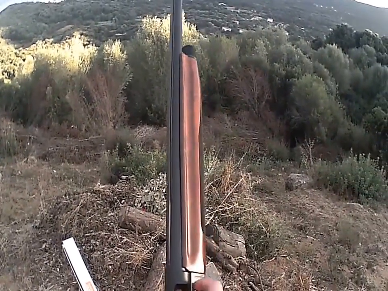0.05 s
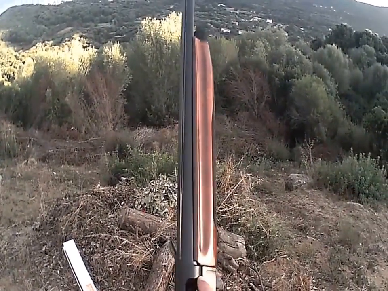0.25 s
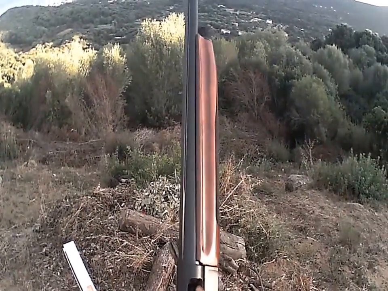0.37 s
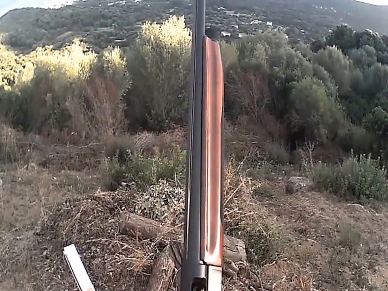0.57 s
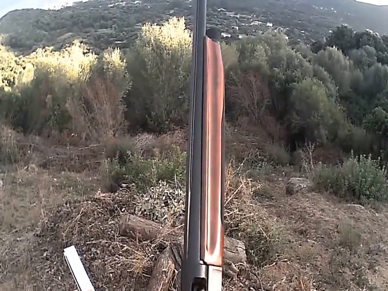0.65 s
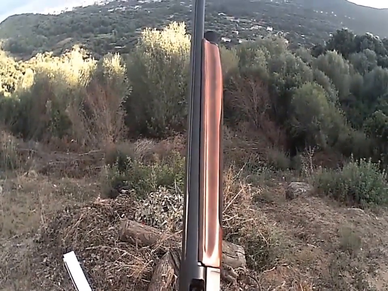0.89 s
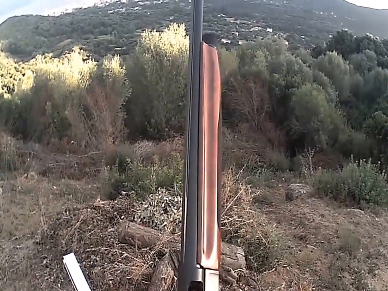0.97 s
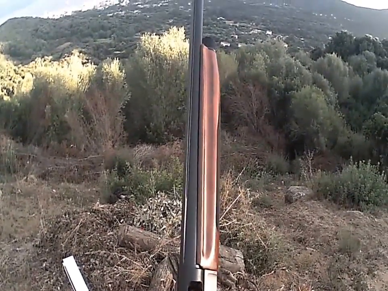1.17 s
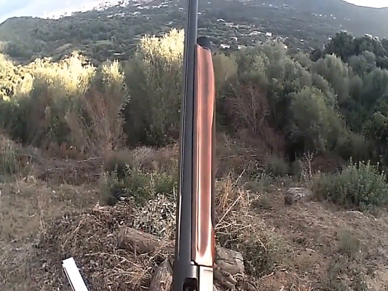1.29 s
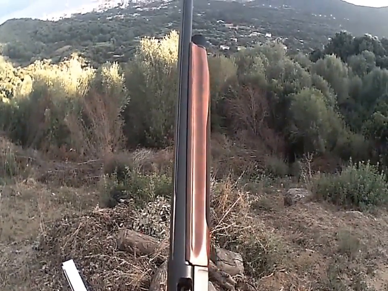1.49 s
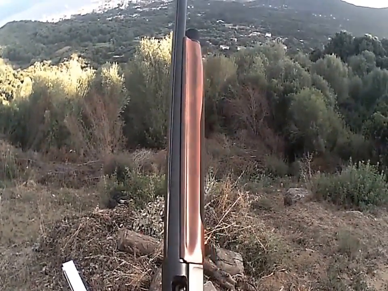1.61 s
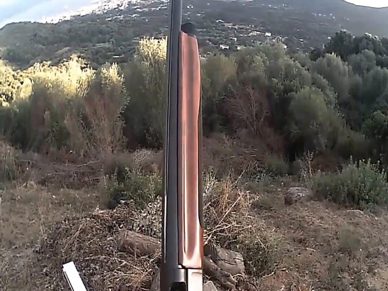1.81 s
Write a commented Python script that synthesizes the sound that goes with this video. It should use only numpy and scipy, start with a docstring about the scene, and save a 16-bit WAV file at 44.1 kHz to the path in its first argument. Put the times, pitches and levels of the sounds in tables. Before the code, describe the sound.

A shotgun action snaps shut with a sharp metallic clack, then faint handling ticks over quiet hiss

```python
"""Outdoors, in a light breeze, a shotgun is handled close to the microphone. Steel scrapes and ticks, then
the action snaps home in a quick run of blows that rings through the gun, and loose parts rattle.
Afterwards the hands shift on the gun with a few faint ticks. Blows and ticks are noise bursts with pinging
modes, blows add the ring of the whole gun, slides are filtered grains, and hiss and breeze are shaped noise.
"""
import sys
import numpy as np
from scipy import signal
from scipy.fft import rfft, irfft
from scipy.io import wavfile
from scipy.ndimage import uniform_filter1d

SR = 44100
rng = np.random.default_rng(int(sys.argv[2]) if len(sys.argv) > 2 else 0)


def bounce(signal):
    """Save signal as a 16-bit WAV file at the path given by the first command-line argument."""
    frames = np.transpose(np.atleast_2d(signal))
    limited = np.clip(frames, -1, 1)
    pcm = np.round(limited * 32767).astype(np.int16)
    wavfile.write(sys.argv[1], SR, pcm)


N = 81585


def amp(db):
    """Turns decibels into gain."""
    return 10 ** (np.asarray(db) / 20)


def evened(x):
    """Scales to rms 1."""
    return x / np.sqrt(np.mean(x ** 2) + 1e-20)


def read(points, hz):
    """Reads a table of (Hz, value) along a log-frequency axis."""
    f, value = np.transpose(points)
    return np.interp(np.log(hz + 1), np.log(f + 1), value)


def add(mix, start_s, sound):
    """Mixes a sound in from its start time."""
    part = mix[round(start_s * SR):][:len(sound)]
    part += sound[:len(part)]


def decay(t, t60):
    """Falls by 60 dB in t60 seconds."""
    return np.exp(-np.log(1000) * t / np.maximum(t60, 1e-4))


def contact(t):
    """The force of a contact builds up in a fraction of a millisecond."""
    build_up_s = 0.0001
    return 1 - np.exp(-(t / build_up_s) ** 2)


def coloured(x, points, hz=1000, lift_db=0, size=4096):
    """Causal filter of unit energy: a spectrum with one resonance lifted out of it."""
    f = np.fft.rfftfreq(size, 1 / SR)
    width_hz = 260 + 0.069 * hz  # a base plus a share of the pitch
    peak = (amp(lift_db) ** 2 - 1) / (1 + ((f - hz) / width_hz) ** 2) ** 2
    log_gain = np.log(evened(amp(read(points, f)) * np.sqrt(1 + peak)))
    # minimum phase puts the energy at the front of the response
    full = np.concatenate([log_gain, log_gain[-2:0:-1]])
    taps = np.fft.ifft(np.exp(np.conj(signal.hilbert(full)))).real
    return signal.fftconvolve(x, taps[:size // 2])[:len(x)]


def noise(points):
    """Steady noise of a given spectrum, at rms 1."""
    gain = amp(read(points, np.fft.rfftfreq(N, 1 / SR)))
    return evened(irfft(rfft(rng.standard_normal(N)) * gain, N))


def burst(t60, size=4096, count=3):
    """Countless modes struck at once: a sharp start, an even spectrum, a steady decay."""
    t = np.arange(size) / SR
    fall = decay(t, t60)
    x = rng.standard_normal(size) * fall
    for _ in range(count):
        # flatten the spectrum, then smooth the envelope and tame stray peaks
        x = irfft(np.exp(1j * np.angle(rfft(x))))
        steady = x / np.sqrt(abs(uniform_filter1d(x ** 2, size=64)) + 1e-14)
        x = 2 * np.tanh(steady / 2) * fall * contact(t)
    return x


def part_ring(hz, t60, size=4096):
    """A small steel part pings: one main mode between two weaker ones."""
    split, twin_db = 0.11, -6  # typical spacing as a share of the pitch; level of each side mode
    t = np.arange(size) / SR

    def mode(side):
        ratio = 1 + side * split * rng.uniform(0.56, 1.36)
        phase = side * rng.uniform(0, 2 * np.pi)
        return np.sin(2 * np.pi * hz * ratio * t + phase)

    modes = mode(0) + amp(twin_db) * (mode(-1) + mode(1))
    modes *= np.sqrt(2) / np.sqrt(1 + 2 * amp(twin_db) ** 2)
    return contact(t) * decay(t, t60) * modes


# Spectrum of the even hiss. Each row: frequency in Hz, relative density in dB per Hz.
HISS_SPECTRUM = [(30, -5), (100, -2), (200, -5.5), (300, -9), (700, -12.5), (1500, -16), (2100, -18),
                 (2600, -17), (3900, -21), (8000, -24), (14500, -25), (16000, -32)]


def hiss():
    """Even hiss: steady noise that thins out towards the treble."""
    return amp(-56.5) * noise(HISS_SPECTRUM)


# Spectrum of the breeze's rumble. Each row: frequency in Hz, relative density in dB per Hz.
BREEZE_SPECTRUM = [(8, -11.5), (20, -3), (30, -0.5), (40, -1), (49, -1), (62, -6.5), (100, -19.5),
                   (160, -37), (400, -58)]


def breeze():
    """The low rumble of a breeze on the microphone, its level drifting slightly with the gusts."""
    level_db, gust_db, gust_s = -55, 0.5, 0.2  # mean level, spread of the drift, time between its turns
    t = np.arange(N) / SR
    knots = rng.standard_normal(size=64)
    gusts = np.interp(t / gust_s, np.arange(len(knots)), knots)
    return amp(level_db + gust_db * gusts) * noise(BREEZE_SPECTRUM)


# Light ticks of small parts. Each row: start in seconds, crack level in dB, pitch of the part in Hz,
# level of its ping in dB, t60 of both in seconds.
TICK_EVENTS = [(0.164, -51, 6500, -53, 0.024), (.1693, -42, 2000, -47, .014), (.1760, -49, 5700, -52, 0.05),
               (.1828, -45, 14800, -42, 0.018), (0.1836, -44, 1980, -37.5, 0.023),
               (0.1944, -28, 11750, -23.5, .009), (0.1961, -35.5, 1960, -38, 0.016),
               (0.2627, -33, 5900, -31.5, 0.0092), (0.2711, -34.5, 5680, -32.5, 0.0117),
               (0.4738, -41, 5280, -42, 0.0094), (1.2518, -44, 3300, -39, .011),
               (1.2520, -39, 6550, -38, .009), (1.2514, -47, 14300, -40, .008),
               (1.261, -44, 3590, -44, .015), (1.3356, -54, 3300, -55, 0.019),
               (1.3360, -58, 14000, -51, .012), (1.3520, -49, 13900, -42, .013),
               (1.4004, -62, 3280, -54.5, .018), (1.4600, -55, 5000, -56.5, .012),
               (1.5135, -49, 12000, -54, 0.014), (1.836, -54, 3000, -54, 0.018)]
# Colour of a light touch, for ticks and slides. Each row: frequency in Hz, relative density in dB per Hz.
TOUCH_COLOUR = [(100, -16), (400, -7), (1000, -2), (3500, 1.5), (7000, -0.5), (10000, -2), (14800, -7),
                (16000, -21)]


def ticks():
    """Light contacts ring only the small part that is touched."""
    out = np.zeros(N)
    for start_s, crack_db, hz, part_db, t60 in TICK_EVENTS:
        crack = amp(crack_db) * coloured(burst(t60), TOUCH_COLOUR)
        ping = amp(part_db) * part_ring(hz, t60)
        add(out, start_s, crack + ping)
    return out


# Colour of the echo from ground and bushes. Each row: frequency in Hz, relative density in dB per Hz.
SCATTER_COLOUR = [(200, -9), (1500, 0), (6000, -4), (16000, -4)]


def scatter(x):
    """Ground and bushes return a faint, short tail of decaying noise."""
    level_db, t60_s = -33.5, 0.45
    t = np.arange(SR // 2) / SR
    tail = coloured(rng.standard_normal(len(t)) * decay(t, t60_s), SCATTER_COLOUR)
    return amp(level_db) * signal.fftconvolve(x, tail / np.linalg.norm(tail))[:N]


# Sliding of steel and hands on the gun. Each row: start in seconds, length in seconds, level in dB,
# pitch of the resonance in Hz, its prominence in dB.
SLIDE_STROKES = [(.181, 0.013, -47, 1000, 15), (0.198, .024, -48, 1200, 11), (0.252, 0.032, -57, 5700, 1),
                 (.446, .012, -54, 2800, 13), (0.46, 0.02, -55, 2000, 14), (1.248, 0.022, -52, 1150, 10.5),
                 (1.308, .011, -51, 1100, 23), (1.41, 0.094, -62, 15300, 25), (1.836, .02, -56.5, 790, 18)]


def slides():
    """Sliding surfaces catch and slip in tiny grains under a swelling stroke."""
    grains_per_s, grain_spread_db = 7000, 4
    out, t = np.zeros(N), np.arange(N) / SR
    for start_s, length_s, db, hz, lift_db in SLIDE_STROKES:
        grains = rng.standard_normal(N) * (rng.random(N) < grains_per_s / SR)
        grains *= amp(grain_spread_db * rng.standard_normal(N))
        stroke = np.sqrt(abs(np.sin(np.pi * np.clip((t - start_s) / length_s, 0, 1))))
        out += amp(db) * coloured(evened(grains) * stroke, TOUCH_COLOUR, hz, lift_db)
    return out


# Clear modes of receiver and barrels. Each row: pitch in Hz, relative level in dB, t60 in seconds.
GUN_MODES = [(580, -12, .04), (770, -4, .03), (870, -3, .03), (1230, -8, 0.043), (1518, -0.5, 0.026),
             (1646, -6.5, 0.028), (1953, 0, 0.035), (2240, -3, 0.046), (2820, -2, 0.03), (3010, -2, .042),
             (3300, -5, .045), (3740, -3.5, 0.042), (4400, -11.5, .045), (5810, -6, 0.035),
             (7130, -5, .032), (14530, 2.5, 0.034)]
# Dense ringing between these modes. Each row: frequency in Hz, relative density in dB per Hz.
WASH_COLOUR = [(100, -40), (300, -19), (600, -0.5), (950, 0), (1500, -2), (3500, -3), (6500, -3),
               (9000, -7), (12500, -6.5), (15000, -6), (16000, -16)]
# Decay of the dense ringing. Each row: frequency in Hz, t60 in seconds.
WASH_T60 = [(400, 0.033), (1500, 0.042), (5000, .038), (15000, 0.047)]


def gun_ring(size=4096):
    """The ring of the whole gun: clear modes over a dense wash of weaker ones."""
    t = np.arange(size) / SR
    # the wash is noise whose bands each decay at their own rate
    f, when, z = signal.stft(rng.standard_normal(size), SR, nperseg=128)
    band_decay = decay(when, read(WASH_T60, f)[:, None])
    wash = signal.istft(z * band_decay, SR, nperseg=128)[1][:size]
    clear = np.zeros(size)
    for hz, db, t60 in GUN_MODES:
        clear += amp(db) * decay(t, t60) * np.sin(2 * np.pi * (hz * t + rng.random()))
    power = sum(amp(db) ** 2 for _, db, _ in GUN_MODES) / 2
    return coloured(wash, WASH_COLOUR) + clear * contact(t) / np.sqrt(power)


# Blows of the action snapping home. Each row: start in seconds, crack level in dB, crack t60 in seconds,
# crack low cut in Hz, pitch of the struck part in Hz, level of its ping in dB, ring of the whole gun in dB.
ACTION_BLOWS = [(.2184, -18, .010, 2400, 6000, -16, -36), (0.2205, -16, .008, 2400, 4290, -9, -30),
                (.2244, -19, .012, 1300, 13000, -17, -33), (.2268, -12.5, .016, 1400, 6900, -10.5, -26),
                (.2278, -15, .013, 500, 1700, -8.5, -22), (.2295, -15, .009, 700, 3000, -15, -24),
                (.2328, -33, .022, 500, 14700, -19, -26), (0.2383, -28, .007, 600, 5500, -28, -43)]
# Colour of a blow's crack. Each row: frequency in Hz, relative density in dB per Hz.
CRACK_COLOUR = [(100, -12), (350, -5), (800, 3), (1400, -.5), (3100, 1.5), (6000, -1.5), (9000, -.5),
                (14800, -.5), (16000, -18)]


def action():
    """Each blow cracks, pings the part that is struck and sets the whole gun ringing."""
    ring_share = 0.65  # the ping's t60 as a share of the crack's
    radiation_hz = 280  # the slender gun radiates little below this
    out = np.zeros(N)
    for start_s, crack_db, t60, low_hz, hz, part_db, ring_db in ACTION_BLOWS:
        low_cut = signal.butter(2, low_hz, "high", fs=SR)
        crack = amp(crack_db) * signal.lfilter(*low_cut, coloured(burst(t60), CRACK_COLOUR))
        ping = amp(part_db) * part_ring(hz, ring_share * t60)
        add(out, start_s, crack + ping + amp(ring_db) * gun_ring())
    return signal.lfilter(*signal.butter(3, radiation_hz, "high", fs=SR), out)


def scene():
    """The gun, its faint echo and the open air."""
    gun = action() + ticks() + slides()
    return (gun + scatter(gun) + hiss() + breeze())[None]


def record(dry):
    """The recorder's band limit takes off the top treble."""
    edge_hz = 16000
    low_pass = signal.firwin(255, edge_hz, window=("kaiser", 9), fs=SR)
    return signal.oaconvolve(dry, low_pass[None], "same")


dry = scene()
out = record(dry)
bounce(out)
```